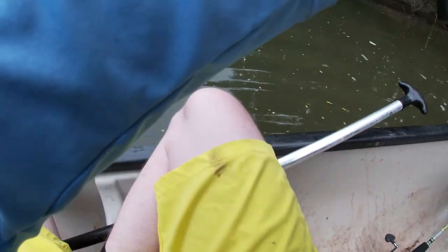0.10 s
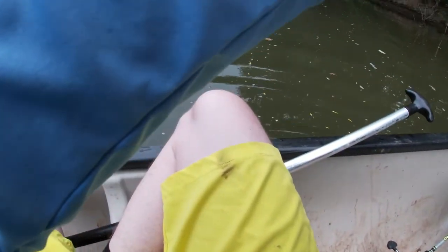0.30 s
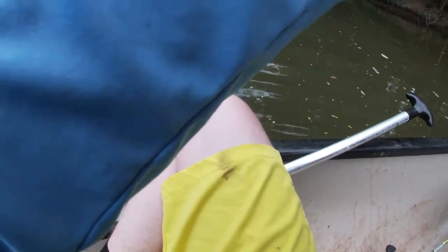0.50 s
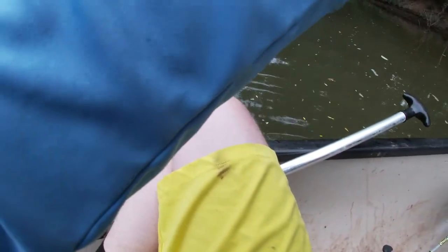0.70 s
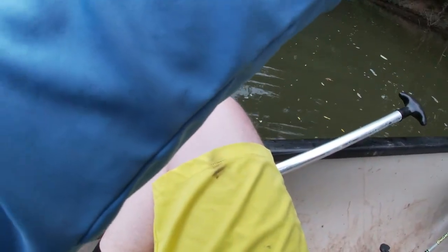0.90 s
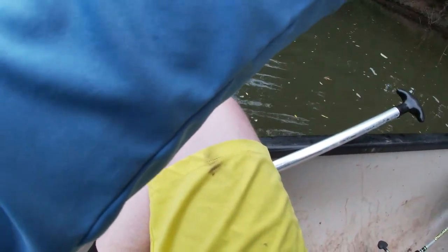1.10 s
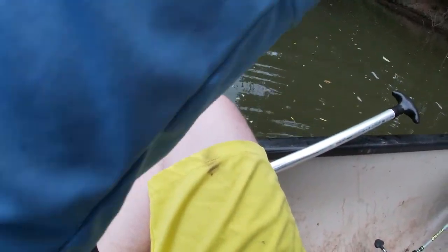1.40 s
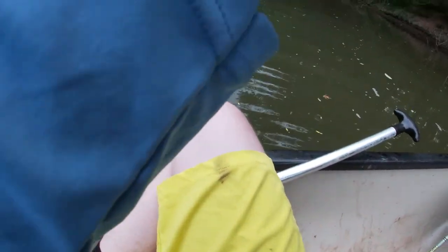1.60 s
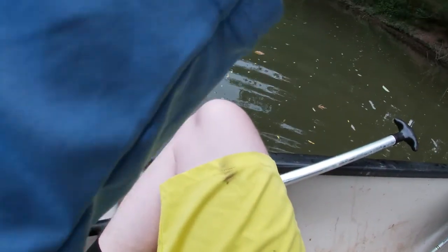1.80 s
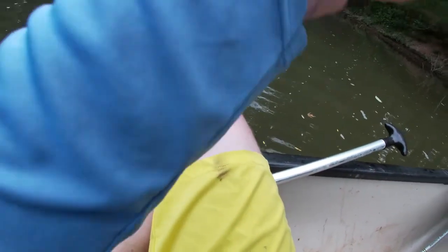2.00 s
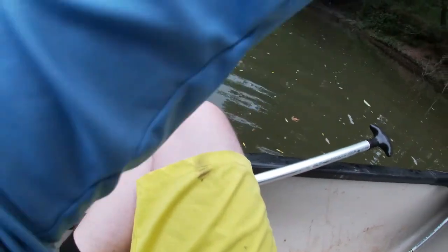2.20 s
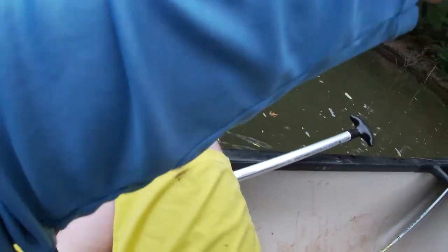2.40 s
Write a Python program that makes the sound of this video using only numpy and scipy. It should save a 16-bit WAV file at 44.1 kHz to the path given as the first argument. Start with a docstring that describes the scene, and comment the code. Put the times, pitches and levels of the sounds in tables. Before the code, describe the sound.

Dull bumps thud through a canoe, a reel ticks rapidly, and cloth rustles close over faint insects

```python
"""An angler shifts in a plastic canoe on a creek, close to the microphone: knocks cross the hull as
bending waves, treble first and bass last, with dense reflections and ringing hull modes.
The fishing reel ticks ten times as tiny ringing strikes, then the tackle snaps three times, duller.
Near the end a shirt rustles close by: noise grains, flicking creases and rubbing, over a camera rumble.
Behind lie insects on the banks (pulsed resonances over noise), a far bird and a low wash of water and air."""
import sys
import numpy as np
from scipy import signal
from scipy.fft import rfft, irfft
from scipy.io import wavfile

SR = 44100
rng = np.random.default_rng(int(sys.argv[2]) if len(sys.argv) > 2 else 0)


def pcm_store(signal):
    """Save signal as 16-bit PCM."""
    levels = np.round(np.clip(np.atleast_2d(signal), -1, 1) * 32767)
    wavfile.write(sys.argv[1], SR, levels.astype(np.int16).T)


N = 114660
TIME = np.arange(N) / SR

# Blows on the hull; each place struck stirs two resonances most: (time [s],
# level before a common lift [dB], hardness as high cut-off [Hz], low cut-off [Hz],
# delay of the 100 Hz wave [s], lower resonance [Hz], upper resonance [Hz])
HULL_KNOCKS = [(0.106, -45.5, 494, 217, 0.0067, 282, 388), (0.2416, -19, 1760, 114, .0031, 410, 1250),
               (0.2536, -12, 640, 68, 0.00956, 104.1, 506), (.410, -23.5, 1130, 125, 0.0036, 189, 996),
               (0.511, -25, 715, 147, 0.0051, 590, 1030), (.67, -39.5, 1180, 130, 0.01214, 187, 340),
               (0.715, -35.5, 382, 60, 0.0095, 180, 420), (.779, -25.5, 627, 186, 0.0092, 438, 680),
               (.809, -22.5, 350, 86, 0.0029, 138, 411), (.904, -36, 464, 141, .003, 180, 350),
               (1.531, -33.5, 303, 70, 0.01006, 181, 300), (1.58, -30, 88, 30, .014, 45.6, 77)]
# Ringing modes of the hull: (frequency [Hz], relative level [dB], time to fall 60 dB [s])
HULL_MODES = [(98.1, -6.5, 0.19), (115, 1.5, 0.066), (157.5, -4, 0.43), (260.6, -4, 0.27),
              (352.1, -4.5, 0.27), (420.7, -5, 0.22), (518.2, 1, 0.1), (591.4, -7, 0.16), (793, -2, 0.16),
              (1144, -5.5, 0.1)]
# Colour of a blow: (frequency [Hz], relative level [dB per Hz])
BLOW_COLOUR = [(40, -6), (120, -2.5), (215, -8.5), (520, -7), (650, -6.5), (4000, -9), (11000, -25.5)]
# Decay of the dense reflections in the hull: (frequency [Hz], time to fall 60 dB [s])
HULL_DECAY = [(60, 0.27), (200, 0.45), (500, 0.21), (2000, 0.069), (6000, 0.078)]
KNOCK_LIFT_DB = 23.5  # common to all knocks
WAVE_DB, DENSE_DB, MODES_DB = -4.5, -0.5, -3  # shares of one blow
WAVE_S = 0.0025  # time to the peak of the bending wave's envelope
PANEL_DB, PANEL_WIDTH = 8.5, 0.062  # lift of the two resonances; half width as a share of frequency

# Reel clicks: (time [s], level [dB], main ring [Hz], rebound after [s], overtone [Hz],
# overtone level [dB])
REEL_CLICKS = [(0.6732, -14, 7290, .0006, 11720, -3), (0.7317, -14.5, 7150, .0005, 11380, -7),
               (0.7832, -13, 7150, .0017, 10460, -17), (0.8221, -11.5, 6860, .0007, 8700, -21),
               (0.8567, -14, 6580, .0014, 8440, -4), (.8874, -13, 6870, .0016, 9200, -14),
               (0.9577, -14.5, 6850, .0013, 10700, -8.5), (1.0004, -12, 6920, .0013, 10800, -12),
               (1.0253, -13.5, 6750, .0012, 10600, -18), (1.0552, -14.5, 6790, .0013, 10850, -11)]
# Reel modes: (ratio to the main ring, relative level [dB], time to fall 60 dB [s])
REEL_MODES = [(.29, -26.5, 0.0062), (.335, -18, 0.0083), (.59, -23.5, 0.0097), (.92, -13, 0.016),
              (1, -.5, 0.0075), (1.09, -2.5, 0.0043)]
# Duller snaps of the tackle: (time [s], level [dB])
TACKLE_SNAPS = [(1.125, -35.5), (1.138, -34.5), (1.2028, -13.5)]
# Tackle modes: (frequency [Hz], relative level [dB], time to fall 60 dB [s])
TACKLE_MODES = [(2114, 3, 0.009), (4280, -3.5, 0.0052), (6140, -2, 0.0023), (7370, -7.5, 0.0087)]
STRIKE_RISE_S, REBOUND_DB, OVERTONE_T60_S = 0.00035, -6, 0.0063
CLICK_GRIT_DB, CLICK_GRIT_T60_S, CLICK_GRIT_HZ, CLICK_GRIT_WIDTH_HZ = -8, 0.0078, 9140, 4100
SNAP_GRIT_DB, SNAP_GRIT_T60_S, SNAP_GRIT_TOP_HZ = -6, 0.0076, 7300
SCATTER_DB, SCATTER_T60_S = -9.5, 0.028

# Shirt rustle near the microphone: (time [s], level [dB])
CLOTH_LEVEL = [(1.96, -87), (2.0, -51), (2.025, -53), (2.14, -55.5), (2.33, -52), (2.44, -56), (2.6, -49.5)]
# Colour of the cloth: (frequency [Hz], relative level [dB per Hz])
CLOTH_COLOUR = [(200, -18), (1600, 5.5), (3000, 5.5), (8500, 3.5), (15000, -25)]
# Flicking creases: (time [s], level before the resonance [dB], ring [Hz])
CREASE_FLICKS = [(2.004, -25, 6100), (2.154, -41, 10400), (2.193, -34, 9300), (2.2171, -24, 5170),
                 (2.302, -30, 7500)]
# Cloth rubbing: (time [s], level [dB])
RUB_LEVEL = [(1.99, -85), (2.13, -48.5), (2.28, -56.5), (2.45, -68), (2.54, -51)]
RUB_HZ, RUB_WIDTH_HZ = 2336, 480
SWAY_MIDDLE_S, SWAY_HALF_S, SWAY_DB = 2.237, 0.17, -46

# Insect chorus on the banks: (frequency [Hz], relative level [dB per Hz])
CHORUS_COLOUR = [(1600, -28.5), (2350, -13.5), (3000, -10), (3800, -8), (4500, -14), (6500, -4.5),
                 (7200, -2), (7650, -17.5), (9000, -26), (12200, -43.5)]
# Level of the far chorus: (time [s], level [dB])
CHORUS_LEVEL = [(1.1, -50), (1.9, -47.5), (2.6, -46.5)]
SINGERS_HZ, SINGERS_SPREAD_HZ, SINGER_STAGE_WIDTH_HZ = 6855, 127, 354
SINGERS_PER_S = 190  # basic pulse rate, which each singer scales by its own factor
SINGERS_DB = -4.5  # relative to the far chorus

# Far bird: (time [s], level [dB])
BIRD_CALLS = [(1.69, -55.5), (2.30, -52.5), (2.443, -52)]
BIRD_HZ, BIRD_STAGE_WIDTH_HZ, BIRD_S = 1248, 220, 0.069

# Colour of creek and air: (frequency [Hz], relative level [dB per Hz])
WASH_COLOUR = [(20, 5.5), (100, -15.5), (160, 0.5), (300, -7), (550, -17), (1300, -14.5), (3500, -44)]
# Level of creek and air: (time [s], level [dB])
WASH_LEVEL = [(0, -67.5), (.25, -46.5), (.62, -53), (1.38, -62.5), (1.68, -55.5), (1.86, -69.5),
              (2.07, -55), (2.3, -59), (2.6, -44.5)]

# Dull top of the microphone: (frequency [Hz], gain [dB])
MICROPHONE_RESPONSE = [(11800, 0.5), (14000, -4.5), (16300, -15)]
EDGE_HZ = 16500  # band limit
LEAN_DB, LEAN_HZ = 2, 14300  # top treble: raised on the left, lowered on the right


def hull():
    """All knocks on the nearby canoe, each sounding from its own moment."""
    out = np.zeros(N)
    for s, *blow in HULL_KNOCKS:
        add(out, s, knock(*blow))
    return out


def knock(db, hard_hz, low_hz, lag, *panel_hz):
    """A bending wave, dense reflections and hull modes, coloured by the spot; low waves travel slowest."""
    size = 2 ** 15
    t = np.arange(size) / SR
    hz = np.fft.rfftfreq(size, 1 / SR)
    build_up = np.minimum(t / (2 * WAVE_S), 1)
    body = causal(amp(read(BLOW_COLOUR, hz)))

    wave = rng.standard_normal(size) * t / WAVE_S * np.exp(-t / WAVE_S)
    wave = unit(irfft(rfft(unit(wave)) * body))

    # Reflections: noise that dies at its own pace in each band
    f, at, bins = signal.stft(rng.standard_normal(size), SR, nperseg=256)
    decay = amp(-60 * at / read(HULL_DECAY, f)[:, None])
    dense = signal.istft(bins * decay, SR, nperseg=256)[1][:size]
    dense = unit(irfft(rfft(dense * build_up) * body))

    modes = unit(ring(HULL_MODES, t) * build_up)
    blow = amp(WAVE_DB) * wave + amp(DENSE_DB) * dense + amp(MODES_DB) * modes

    panel_db = sum(PANEL_DB / (1 + ((hz / centre - 1) / PANEL_WIDTH) ** 2) for centre in panel_hz)
    low_cut = 1 / np.sqrt(1 + (low_hz / (hz + 1)) ** 6)
    high_cut = 1 / np.sqrt(1 + (hz / hard_hz) ** 3.23)
    contact = causal(amp(panel_db) * low_cut * high_cut)
    # Bending waves: delay falls with the root of frequency
    travel = np.exp(-4j * np.pi * lag * np.sqrt(100 * hz))
    return amp(db + KNOCK_LIFT_DB) * irfft(rfft(blow) * contact * travel)


def reel():
    """Clicks and snaps at close range; the boat scatters their sound briefly."""
    strikes = clicks() + snaps()
    t = np.arange(SR // 20) / SR
    scatter = unit(rng.standard_normal(len(t)) * amp(-60 * t / SCATTER_T60_S) * (t > .001))
    heard = strikes + amp(SCATTER_DB) * signal.fftconvolve(strikes, scatter)[:N]
    return signal.sosfilt(signal.butter(6, 1450, "high", fs=SR, output="sos"), heard)


def clicks():
    """Tiny hard strikes ring the reel's modes, each with a weaker rebound."""
    out = np.zeros(N)
    t = np.arange(SR // 20) / SR
    rise = np.minimum(t / STRIKE_RISE_S, 1)
    for s, db, hz, after, top_hz, top_db in REEL_CLICKS:
        tone = ring(REEL_MODES, t, hz) + ring([(top_hz, top_db, OVERTONE_T60_S)], t)
        whole_cycles_s = round(after * hz) / hz  # the rebound falls in step with the main ring
        for delay, drop_db in ((0, 0), (whole_cycles_s, REBOUND_DB)):
            noise = resonate(rng.standard_normal(len(t)), CLICK_GRIT_HZ, CLICK_GRIT_WIDTH_HZ)
            grit = amp(CLICK_GRIT_DB - 60 * t / CLICK_GRIT_T60_S) * noise
            add(out, s + delay, amp(db + drop_db) * rise * (tone + grit))
    return out


def snaps():
    """The tackle's lower modes ring with a short burst of dulled noise."""
    out = np.zeros(N)
    t = np.arange(SR // 20) / SR
    rise = np.minimum(t / STRIKE_RISE_S, 1)
    dull = signal.butter(4, SNAP_GRIT_TOP_HZ, fs=SR, output="sos")
    for s, db in TACKLE_SNAPS:
        burst = amp(SNAP_GRIT_DB - 60 * t / SNAP_GRIT_T60_S) * rng.standard_normal(len(t))
        grit = signal.sosfilt(dull, burst)
        add(out, s, amp(db) * rise * (ring(TACKLE_MODES, t) + grit))
    return out


def shirt(grains_per_s=2500, spread_db=4, clump_db=3.0):
    """Near the microphone, fibres slip in clumps of small grains, creases flick and cloth rubs."""
    struck = rng.random(N) < grains_per_s / SR
    strength = amp(spread_db * np.minimum(rng.exponential(1, N), 2))
    grains = struck * rng.standard_normal(N) * strength
    clumps = grains * amp(clump_db * drift(59))
    cloth = level(CLOTH_LEVEL) * evened(colour(clumps, CLOTH_COLOUR))

    flicks = np.zeros(N)
    t = np.arange(SR // 20) / SR
    for s, db, hz in CREASE_FLICKS:
        burst = amp(db - 60 * t / 0.015) * rng.standard_normal(len(t))
        add(flicks, s, resonate(burst, hz, 1300))

    rub = level(RUB_LEVEL) * band(RUB_HZ, RUB_WIDTH_HZ) * amp(2.15 * drift(31))
    return cloth + flicks + rub


def sway():
    """Rumble of the moving camera: very low noise that swells and fades once."""
    swell = np.exp(-((TIME - SWAY_MIDDLE_S) / SWAY_HALF_S) ** 2)
    return amp(SWAY_DB) * swell * band(8.2, 22)


def insects(count=8):
    """On the banks, nearer singers pulse a shrill resonance over the blurred far chorus."""
    singers = np.zeros(N)
    for place in np.linspace(-1, 1, count):
        rate = SINGERS_PER_S * rng.uniform(0.54, 1.4) * (1 + .06 * drift(40))
        turns = np.cumsum(rate) / SR
        # One pulse per whole turn, of chance strength
        pulses = np.diff(np.floor(turns), prepend=0) * (1 + 1.3 * rng.standard_normal(N))
        hz = SINGERS_HZ + SINGERS_SPREAD_HZ * place + 30 * drift(4.9)
        once = resonate(pulses, hz, SINGER_STAGE_WIDTH_HZ)
        song = evened(resonate(once, hz, SINGER_STAGE_WIDTH_HZ))
        singers += song * amp(2 * drift(36))
    far = evened(colour(rng.standard_normal(N), CHORUS_COLOUR)) * amp(.5 * drift(26))
    return level(CHORUS_LEVEL) * (far + amp(SINGERS_DB) * evened(singers))


def bird():
    """Short far calls: rounded bursts of noise in a steep resonance."""
    calls = np.zeros(N)
    for s, db in BIRD_CALLS:
        add(calls, s, amp(db) * np.hanning(round(BIRD_S * SR)) ** .5)
    return calls * band(BIRD_HZ, BIRD_STAGE_WIDTH_HZ)


def creek():
    """Low background wash of water and air: coloured noise of unsteady level."""
    wash = evened(colour(rng.standard_normal(N), WASH_COLOUR)) * amp(3.3 * drift(10.0))
    return level(WASH_LEVEL) * wash


def amp(db):
    """Decibels to gain."""
    return 10 ** (np.asarray(db) / 20)


def evened(x):
    """Scales to rms 1."""
    return x / np.sqrt(np.mean(x ** 2) + 1e-20)


def unit(x):
    """Scales to energy 1."""
    return x / (np.linalg.norm(x) + 1e-12)


def read(points, hz):
    """Reads a table on a log-frequency axis."""
    f, value = np.transpose(points)
    return np.interp(np.log(hz + 1), np.log(f + 1), value)


def level(points):
    """Gain over time from (time [s], level [dB]) points."""
    s, db = np.transpose(points)
    return amp(np.interp(TIME, s, db))


def add(mix, s, sound):
    """Mixes a sound in at a time in seconds."""
    part = mix[max(round(s * SR), 0):][:len(sound)]
    part += sound[:len(part)]


def colour(x, points):
    """Filters by a table of gain over frequency."""
    hz = np.fft.rfftfreq(len(x), 1 / SR)
    return irfft(rfft(x) * amp(read(points, hz)), len(x))


def causal(gain):
    """The minimum-phase response with this gain, which never sounds before its cause."""
    log = np.log(np.maximum(gain, 1e-5))
    mirrored = np.r_[log, log[-2:0:-1]]
    return np.exp(np.conj(signal.hilbert(mirrored)))[:len(gain)]


def resonate(x, hz, width):
    """One resonance of peak gain 1 whose frequency may move; width in Hz."""
    turn = np.exp(2j * np.pi * np.cumsum(hz * np.ones(len(x))) / SR)
    r = np.exp(-np.pi * width / SR)
    # Shift the resonance down to zero, smooth there, shift back
    return 2 * (turn * signal.lfilter([1 - r], [1, -r], x / turn)).real


def band(hz, width):
    """Noise of rms 1 through two equal resonances in a row."""
    once = resonate(rng.standard_normal(N), hz, width)
    return evened(resonate(once, hz, width))


def drift(rate):
    """Slow chance wandering of rms 1, mostly below the rate in Hz."""
    hz = np.fft.rfftfreq(N, 1 / SR)
    return evened(irfft(rfft(rng.standard_normal(N)) / (1 + (hz / rate) ** 4), N))


def ring(modes, t, scale=1):
    """Dying sines, each set off in a chance direction."""
    total = 0
    for hz, db, t60 in modes:
        direction = rng.choice([-1, 1])
        total = total + direction * amp(db - 60 * t / t60) * np.sin(2 * np.pi * hz * scale * t)
    return total


def scene():
    """Everything reaches the microphone almost as one channel, apart from the top treble."""
    mono = hull() + reel() + shirt() + sway() + insects() + bird() + creek()
    return np.array([colour(mono, [(9000, 0), (LEAN_HZ, side * LEAN_DB)]) for side in (1, -1)])


def record(dry):
    """The dull top and the band limit of the camera's microphone."""
    heard = np.array([colour(x, MICROPHONE_RESPONSE) for x in dry])
    band_limit = signal.firwin(255, EDGE_HZ, window=("kaiser", 9), fs=SR)
    return signal.oaconvolve(heard, band_limit[None], "same", axes=1)


dry = scene()
out = record(dry)
pcm_store(out)
```